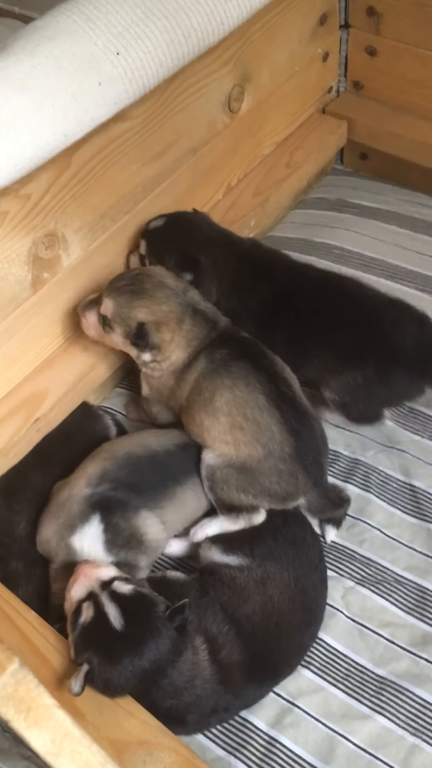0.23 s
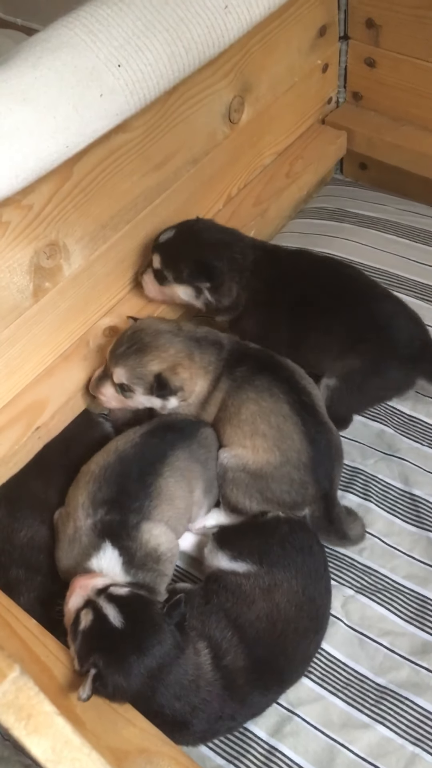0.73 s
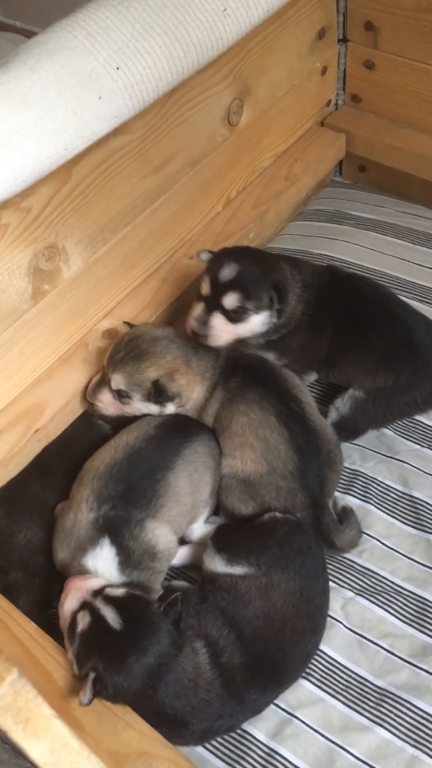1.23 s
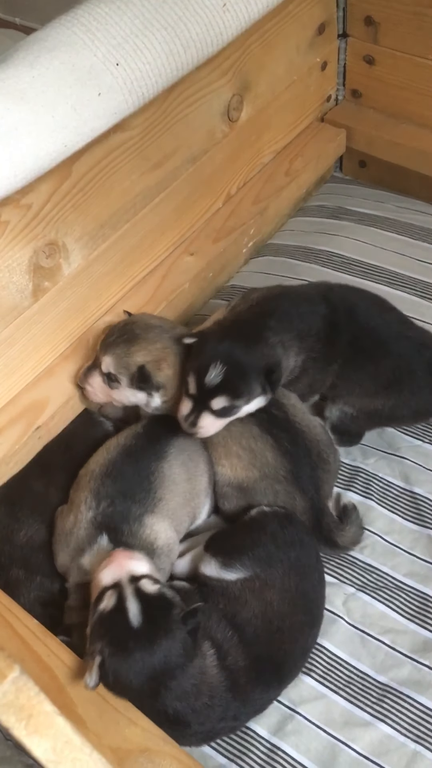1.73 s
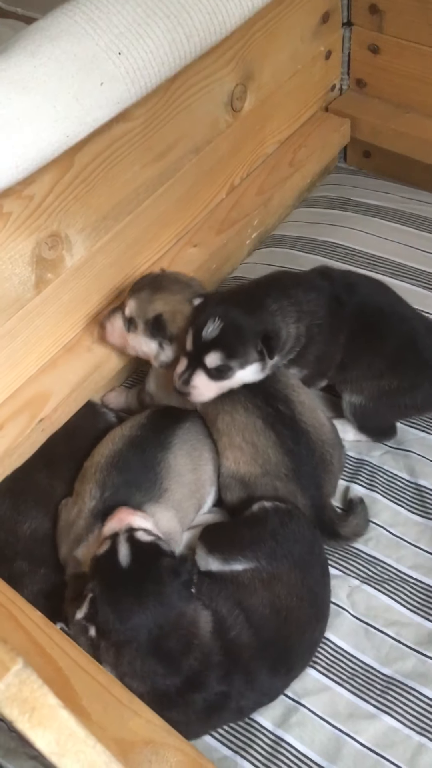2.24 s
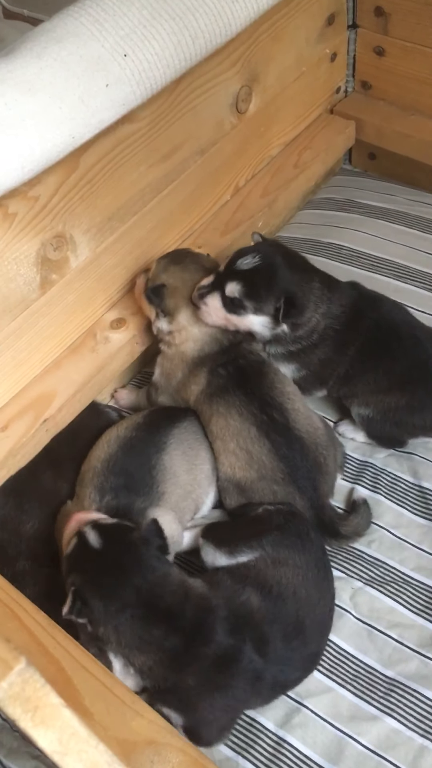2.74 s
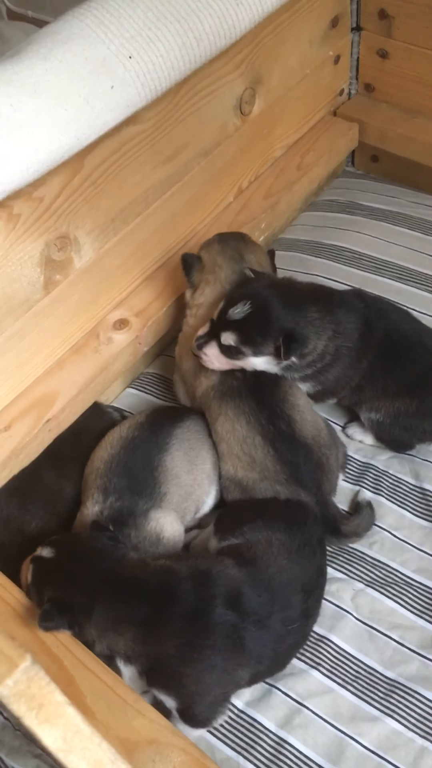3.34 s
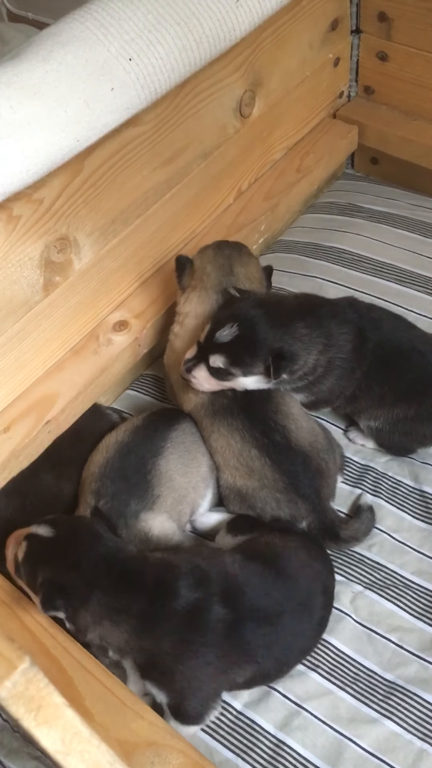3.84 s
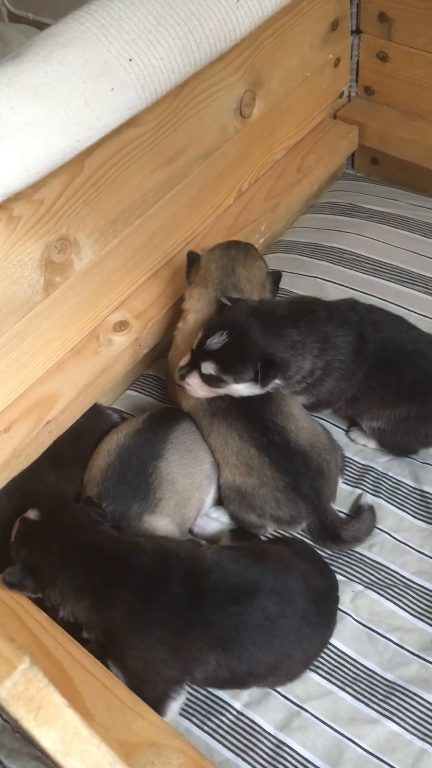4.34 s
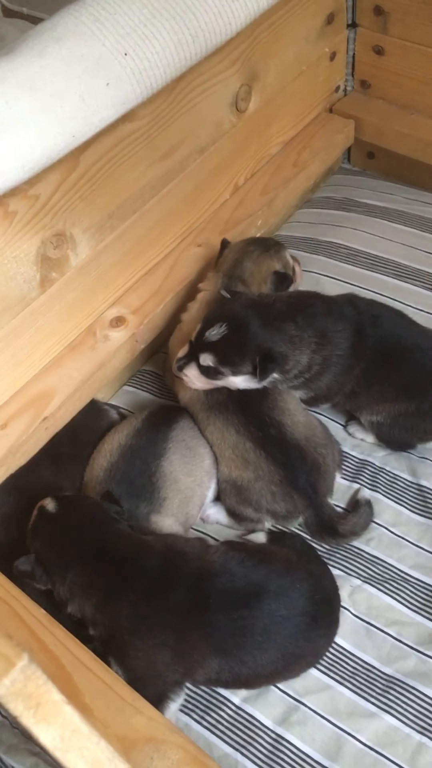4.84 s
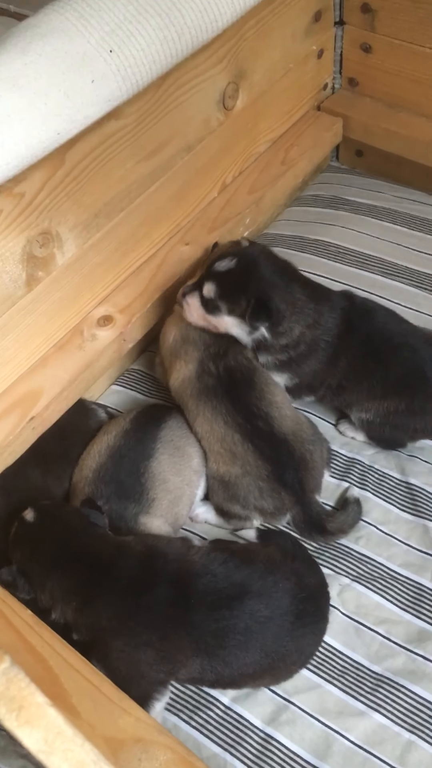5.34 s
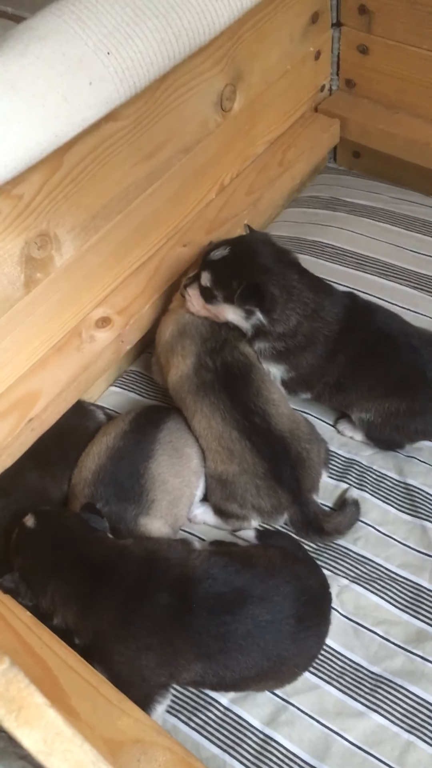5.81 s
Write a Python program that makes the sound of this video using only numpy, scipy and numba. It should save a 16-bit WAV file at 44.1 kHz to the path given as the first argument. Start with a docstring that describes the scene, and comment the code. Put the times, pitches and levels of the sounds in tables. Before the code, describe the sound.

Close, plain phone pickup of very young puppies in a small wooden pen indoors. Short squeaky cries come first, loud and bright, gliding up and breaking downward. A busy patch of claw taps and a dull bump follows, then quieter, lower, broken whimpers with long gaps. Light sniffs, cloth rustle and faint room hum continue underneath, and a sharp wooden tap comes near the end.

```python
"""Newborn puppies squeal and whimper in a wooden box lined with cloth, in a quiet room.
Each voice is a gliding fundamental with overtones shaped by the throat or snout and jumps of register.
Filtered noise makes the nasal hiss, gliding sines its thin whistles, uneven cycles a low grunt.
Claws and bumps ring decaying modes; box echoes and a room tail answer over hum, room tone and shuffling."""
import sys
import numpy as np
from scipy import signal
from scipy.fft import rfft, irfft, next_fast_len
from scipy.io import wavfile
from scipy.ndimage import uniform_filter1d, minimum_filter1d
from numba import njit

SR = 44100
rng = np.random.default_rng(int(sys.argv[2]) if len(sys.argv) > 2 else 0)


def materialize(psi):
    """Save the field psi as 16-bit PCM at rate SR to the path in sys.argv[1].

    A 1-D psi becomes a single channel; in a 2-D psi each row is a channel.
    """
    bounded = np.clip(np.atleast_2d(psi).T, -1, 1)
    quanta = np.round(bounded * 32767).astype(np.int16)
    wavfile.write(sys.argv[1], SR, quanta)


N = 267687
TOP_HZ = 15850  # upper band edge of the phone, and the limit of the overtones


def undb(db):
    """Level law: an amplitude gain is ten to the power of dB over 20."""
    return 10 ** (np.asarray(db) / 20)


def unit(x):
    """Power normalisation: scales the signal to rms 1."""
    return x / np.sqrt(np.mean(x ** 2))


def colour(shape, hz):
    """Spectral envelope: gain at hz, interpolated in dB over log frequency, -90 dB outside."""
    f, db = np.transpose(shape)
    level_db = np.interp(np.log(np.maximum(hz, 1)), np.log(f), db, left=-90, right=-90)
    return undb(level_db)


def noise(shape, size):
    """Spectral shaping: white noise weighted in the frequency domain, rms 1."""
    n = next_fast_len(size)
    hz = np.arange(n // 2 + 1) * SR / n
    spectrum = rfft(rng.standard_normal(n)) * colour(shape, hz)
    return unit(irfft(spectrum, n)[:size])


def walk(rate, size):
    """Low-pass random fluctuation: turns about rate times a second, rms 1."""
    k = max(int(SR / rate), 1)
    smooth = uniform_filter1d(rng.standard_normal(size), k)
    return unit(uniform_filter1d(smooth, k))


def read(table, fade_s):
    """Piecewise-linear control: first sample, fade of the ends and the columns at every sample."""
    s, *columns = np.transpose(table)
    i = np.arange(int(s[0] * SR), min(int(s[-1] * SR), N))
    fade = np.clip(np.minimum(i - i[0], i[-1] - i) / (fade_s * SR), 0, 1)
    return max(i[0], 0), fade, [np.interp(i / SR, s, c) for c in columns]


def add(out, start, x):
    """Superposition: sums x into out from a sample on."""
    out[start:start + len(x)] += x[:len(out) - start]


def voice(phrases, law, heads, tract, rough, jitter, airy_db, patchy_db,
          jitter_hz=900., shimmer_hz=300., glide_s=.005, effort_s=.02):
    """Source and filter: small folds give a strong fundamental and tract-shaped, jittered overtones."""
    s, hz, db = np.concatenate(phrases).T
    t, sounding = np.arange(N) / SR, np.zeros(N)
    for phrase in phrases:
        sounding[int(phrase[0][0] * SR):int(phrase[-1][0] * SR) + 1] = 1
    i = np.flatnonzero(sounding)
    # the muscles round off every turn of the pitch
    hz = uniform_filter1d(np.interp(t, s, hz), max(int(glide_s * SR), 1))[i]
    db = np.interp(t[i], s, db)

    starts = np.array([phrase[0][0] for phrase in phrases])
    which = np.maximum(np.searchsorted(starts, t[i] + 1 / SR) - 1, 0)
    octave_db, over_db, treble_db, dulling = np.transpose(heads)[:, which]
    # octave and overtones follow the averaged level and dull as the phrase goes on (brighten if negative)
    effort_db = uniform_filter1d(db, max(int(effort_s * SR), 1))
    effort_db -= dulling * (t[i] - starts[which])
    law_hz, law_octave_db, law_over_db = np.transpose(law)
    octave_db = octave_db + effort_db + np.interp(hz, law_hz, law_octave_db)
    over_db = over_db + effort_db + np.interp(hz, law_hz, law_over_db)

    phase = 2 * np.pi * np.cumsum(hz * (1 + jitter * walk(jitter_hz, len(i)))) / SR
    k = np.arange(3, 24)[:, None]
    gains = colour(tract, k * hz) * (k * hz < TOP_HZ)
    # treble gain grows from 5 kHz and is full from 10 kHz up
    gains *= undb(treble_db * np.clip(np.log2(k * hz / 5000), 0, 1))
    # every overtone flutters in level at random, on its own
    gains *= undb(patchy_db * np.array([walk(55.0, len(i)) for _ in k]))
    over = np.sum(gains * np.sin(k * phase), axis=0) / np.sqrt(np.sum(gains ** 2, axis=0))
    # air leaking past the folds once a cycle takes the colour of the tract
    over += undb(airy_db) * noise(tract, len(i)) * (1 + np.cos(phase)) / 2

    # the shimmer is twice as deep in the octave and three times in the overtones
    shimmer = [1 + rough * n * walk(shimmer_hz, len(i)) for n in (1, 2, 3)]
    out = np.zeros(N)
    out[i] = undb(db) * shimmer[0] * np.sin(phase)
    out[i] += undb(octave_db) * shimmer[1] * np.sin(2 * phase)
    out[i] += undb(over_db) * shimmer[2] * over
    edges = minimum_filter1d(uniform_filter1d(sounding, 60), 60)
    return np.sqrt(2) * out * edges


def whimpers():
    """Closed-mouth radiation: the snout filters the overtones of the folds."""
    # One list a phrase. Each row: time in seconds, pitch in Hz, level of the fundamental in dB.
    phrases = [
        [(0.0, 2018, -24.5), (0.06, 2288, -22), (0.088, 2190, -23.5), (0.12, 2145, -46.5)],
        [(0.942, 1757, -12.5), (0.95, 1886, -23.5), (0.98, 1881, -25.5), (1.014, 1604, -25),
         (1.024, 1181, -38.5), (1.032, 1183, -32.5), (1.05, 857, -51.5)],
        [(1.612, 1949, -50.5), (1.627, 1867, -23.5), (1.647, 1787, -22), (1.763, 1958, -30), (1.809, 1880, -65)],
        [(2.086, 1886, -30), (2.114, 1863, -36.5), (2.196, 1499, -34), (2.228, 1473, -55.5),
         (2.254, 1367, -36.5), (2.262, 1260, -51.5), (2.284, 1020, -75)],
        [(2.515, 1795, -33), (2.537, 1850, -28.5), (2.543, 1675, -43), (2.567, 1533, -28), (2.589, 1480, -36.5),
         (2.597, 1212, -36), (2.623, 1095, -50), (2.643, 893, -38.5), (2.657, 891, -81.5)],
        [(2.843, 778, -41), (2.855, 705, -50.5), (2.893, 814, -39.5), (2.921, 1060, -44), (2.947, 1067, -44.5),
         (2.977, 878, -34.5), (2.999, 942, -44.5)],
        [(3.71, 1600, -64), (3.73, 1744, -54.5), (3.77, 1680, -79.5)],
        [(3.89, 1860, -72), (3.931, 1938, -54), (3.98, 1957, -72.5)],
        [(4.36, 1623, -57.5), (4.38, 1690, -39), (4.44, 1703, -40), (4.468, 1716, -67)],
        [(4.47, 1742, -53), (4.484, 1670, -39.5), (4.538, 1333, -45), (4.546, 1046, -47), (4.596, 960, -40.5),
         (4.628, 753, -50.5), (4.666, 638, -49), (4.69, 718, -65)],
        [(5.075, 823, -75.5), (5.091, 948, -47), (5.099, 740, -46.5), (5.111, 717, -50), (5.143, 947, -39),
         (5.179, 1075, -57), (5.197, 1074, -44.5), (5.229, 856, -45), (5.259, 955, -41), (5.283, 824, -49.5),
         (5.331, 692, -47.5), (5.359, 710, -73)],
    ]
    # Timbre against pitch. Each row: pitch in Hz, octave and overtones in dB against the effort.
    law = [(650, -10, -25.5), (750, -1, -16.5), (905, -14.5, -27), (1040, -15.5, -18), (1113, -6, -3),
           (1340, -26, -14), (1713, -49, -32), (2250, -27, -35)]
    # Turn of the head and closing mouth. Each row, one a phrase: octave in dB, overtones in dB,
    # treble gain in dB from 10 kHz up, dulling in dB per second.
    heads = [(8.5, 5, 8.5, 96.5), (10, -5, -4, 16), (5.5, 0, 10, -49), (2.5, -5, 6, 23),
             (5.5, -0.5, -7, 15), (3.5, 6, 4.5, -9.5), (4, 3, 4, 15.5), (-2, 4.5, 1, 15),
             (15, 12.5, -5, -48), (-5, -6, -15, -19), (-4, 0, -17, -9)]
    # Resonances of the snout. Each row: frequency in Hz, gain in dB.
    snout = [(2200, -16), (3600, -24), (4500, -26), (4900, -6), (5400, 0), (5900, -3), (6500, -13),
             (7600, -5), (9200, -1), (10400, -13), (11900, -5), (13500, -14), (15600, -17)]
    return voice(phrases, law, heads, snout, rough=.05, jitter=.003, airy_db=-9., patchy_db=4.)


def nose_puffs():
    """Turbulent flow: hiss coloured by two resonances of the nostrils, in short puffs."""
    # Air through the nose, one row a puff. Each row: start in seconds, length in seconds,
    # lower resonance in dB, upper resonance in dB, fall over the puff in dB.
    puffs = [(0.0, 0.13, -50.5, -51.5, 4.5), (.243, .03, -80, -55, 0.5), (0.277, .035, -52, -58.5, 17),
             (0.416, 0.13, -44, -61, 38), (0.849, 0.047, -56.5, -60, 6), (0.935, 0.099, -47, -45.5, 17),
             (1.23, 0.096, -53, -57.5, 23), (1.463, 0.039, -44.5, -65.5, 5), (1.541, 0.32, -57, -61, -2.5),
             (2.053, 0.3, -55.5, -54.5, 23.5), (2.46, 0.2, -55, -68, 3), (2.838, 0.21, -67, -77, -8),
             (3.684, 0.056, -60.5, -69, 3.5), (3.879, 0.16, -68, -69.5, -5), (4.293, .42, -73.5, -70, -2),
             (5.084, 0.33, -64, -76.5, 6)]
    # Two resonances of the nostrils. Each row of each: frequency in Hz, relative level in dB per Hz.
    nostrils = [
        [(2500, -36), (4600, -24), (5600, -13), (6800, -17), (8200, -4), (9200, 0), (9900, -5), (10600, -16)],
        [(10400, -22), (11400, -2), (12300, 0), (13500, -5), (14500, -10), (15900, -11)],
    ]
    out, rise_s, fall_share = np.zeros(N), .015, .3
    # uneven flow
    low, high = (noise(shape, N) * undb(3.5 * walk(30., N)) for shape in nostrils)
    for s, length, low_db, high_db, fall_db in puffs:
        start, fade, (drop_db,) = read([(s, 0), (s + length, -fall_db)], rise_s)
        fade = fade * np.clip(np.linspace(1, 0, len(fade)) / fall_share, 0, 1)
        span = slice(start, start + len(fade))
        hiss = undb(low_db) * low[span] + undb(high_db) * high[span]
        add(out, start, fade * undb(drop_db) * hiss)
    return out


def background(flicker_db=3.5):
    """Stationary and modulated noise: room tone, low hum, uneven shuffle on cloth and soft hiss."""
    # Room tone. Each row: frequency in Hz, relative level in dB per Hz.
    room = [(110, -15), (160, 4), (280, 3), (420, -6.5), (700, -12), (1100, -10.5), (2100, -13.5),
            (3200, -16), (4300, -24), (4900, -24), (6300, -18), (8000, -21), (12500, -17.5), (16500, -21.5)]
    # Low hum. Each row: frequency in Hz, relative level in dB per Hz.
    hum = [(36, -38), (44, -8), (49, 1), (54, -2.5), (68, -16.5), (95, -7.5), (130, -20.5)]
    # Bodies on cloth. Each row: frequency in Hz, relative level in dB per Hz.
    cloth = [(40, -35), (110, -2), (300, -7.5), (450, -15), (900, -29)]
    # Soft mid-range hiss. Each row: frequency in Hz, relative level in dB per Hz.
    hiss = [(290, -34), (500, -4.5), (749, -11.5), (841, -22.5), (900, -7), (1120, -3.5), (1440, -12),
            (2060, -7.5), (2750, -15), (4080, -14), (5000, -23), (6500, -52.5), (11000, -120)]
    # Swell of shuffle and hiss. Each row: time in seconds, shuffle level in dB, hiss level in dB.
    swell = [(0.0, -65, -62.5), (0.49, -56.5, -62), (0.7, -66, -69.5), (1.0, -65, -70), (1.518, -58.5, -63),
             (1.99, -58, -62), (2.3, -65, -74.5), (2.7, -56, -61), (3.16, -70.5, -78), (3.55, -77.5, -81.5),
             (3.95, -63, -72), (4.15, -61.5, -66), (4.9, -63.5, -65), (5.05, -76, -79.5), (5.3, -69.5, -71),
             (5.45, -64.5, -64.5), (6.07, -68, -70.5)]
    tone = noise(room, N) * undb(-65.5) + noise(hum, N) * undb(-62)
    s, *dbs = np.transpose(swell)
    cloth_db, hiss_db = (np.interp(np.arange(N) / SR, s, c) for c in dbs)
    shuffle = unit(noise(cloth, N) * undb(flicker_db * walk(28.0, N)))
    return tone + shuffle * undb(cloth_db) + noise(hiss, N) * undb(hiss_db)


def mode(hz, t60_s, t):
    """Damped resonance: a sine falling 60 dB in t60_s."""
    return np.sin(2 * np.pi * hz * t) * 1000 ** (-t / t60_s)


def claws(tick_t60_s=0.017):
    """Impact excitation: a claw gives a short noisy crack and rings the modes of the board."""
    # Claws on the boards. Each row: time in seconds, tick peak in dB, knock gain in dB.
    taps = [(0.034, -34.5, -49.5), (0.1442, -39, -46), (0.525, -42, -45), (0.6019, -42.5, -45.5),
            (0.7395, -49, -51), (1.1766, -48.5, -55), (1.9528, -36, -37.5), (1.9734, -39, -41.5),
            (2.1525, -35.5, -46.5), (2.3003, -41, -42), (2.4239, -41.5, -45.5), (2.5141, -30, -54),
            (2.574, -35.5, -36.5), (2.6722, -42.5, -53), (2.7771, -39.5, -51.5), (2.9646, -50.5, -40.5),
            (3.4153, -56.5, -73), (3.6714, -62, -58), (3.7253, -47.5, -48.5), (3.922, -63, -40.5),
            (4.0455, -41.5, -47), (4.4762, -50, -77), (5.6414, -28, -37.5)]
    # Spectrum of the crack. Each row: frequency in Hz, relative level in dB per Hz.
    tick = [(1000, 6.5), (2200, -0.5), (3300, 2), (4500, -1), (6200, -1), (9000, -12), (14000, -5.5)]
    # Modes of the board. Each row: frequency in Hz, relative gain in dB, 60 dB decay in seconds.
    board = [(322, 8.5, 0.032), (625, 6, 0.029), (901, 5.5, 0.0083)]
    out, t = np.zeros(N), np.arange(SR // 2) / SR
    for s, tick_db, knock_db in taps:
        crack = noise(tick, len(t)) * 1000 ** (-t / tick_t60_s)
        # every tap excites each mode by a chance amount
        ring = sum(undb(db) * rng.uniform(0.08, 1) * mode(hz, t60, t) for hz, db, t60 in board)
        add(out, int(s * SR), undb(tick_db) * crack / np.abs(crack).max() + undb(knock_db) * ring)
    return out


def bumps(rise_s=0.0075):
    """Soft modal excitation: a body pushes the whole box, whose modes swell in gently and decay."""
    # Bodies bumping the box. Each row: time in seconds, gain of the strongest mode in dB,
    # tilt towards the higher modes in dB per octave.
    pushes = [(0.15, -45, 9), (0.33, -46, -14), (0.475, -39.5, 25.5), (1.366, -47, 8.5), (2.029, -45, 32),
              (2.149, -43, 21.5), (2.585, -30.5, -12), (3.272, -51.5, -2), (5.643, -46.5, 4.5)]
    # Whole-box modes. Each row: frequency in Hz, gain before tilt in dB, 60 dB decay in seconds.
    modes = [(82.6, -10, 0.15), (89, 3.5, 0.18), (115, -0.5, 0.066)]
    out, t = np.zeros(N), np.arange(SR // 2) / SR
    for s, db, tilt_db in pushes:
        gains = np.array([undb(d + tilt_db * np.log2(hz / modes[1][0])) for hz, d, _ in modes])
        gains = gains / gains.max()
        ring = sum(g * mode(hz, t60, t) for g, (hz, _, t60) in zip(gains, modes))
        add(out, int(s * SR), undb(db) * (1 - np.exp(-t / rise_s)) * ring)
    return out


def yelps():
    """Open-mouth radiation: the open throat filters the overtones of the folds."""
    # One list a phrase. Each row: time in seconds, pitch in Hz, level of the fundamental in dB.
    phrases = [
        [(0.299, 1100, -34.5), (0.307, 1145, -20.5), (0.331, 1204, -18.5), (0.353, 1332, -15),
         (0.375, 1442, -9), (0.405, 1515, -18), (0.425, 1410, -15.5), (0.445, 1225, -31), (0.481, 1140, -32),
         (0.497, 992.5, -47.5)],
        [(0.882, 1054, -53.5), (0.89, 1027, -27.5), (0.918, 1341, -23), (0.942, 1555, -15.5)],
        [(1.236, 1007, -50.5), (1.243, 933, -34), (1.262, 930.6, -43), (1.285, 895, -65.5)],
        [(1.478, 961, -44.5), (1.504, 1189, -25.5), (1.524, 1364, -19), (1.546, 1632, -6), (1.554, 1722, -15),
         (1.562, 1910, -19), (1.58, 2015, -36), (1.604, 2040, -50.5)],
        [(1.978, 1095, -56), (1.992, 1122, -36), (2.008, 1209, -30), (2.014, 1298, -39.5), (2.024, 1361, -16.5),
         (2.052, 1724, -14), (2.064, 1814, -20), (2.086, 1819, -23)],
        [(2.448, 1090, -42.5), (2.464, 1110, -44), (2.514, 1406, -33)],
    ]
    # Timbre against pitch. Each row: pitch in Hz, octave and overtones in dB against the effort.
    law = [(950, 4.5, -10.5), (1231, -0.5, -7.5), (1320, -11.5, -9.5), (1437.4, -19, -16),
           (1700, -26.5, -20.5), (2210, -20, -20)]
    # Turn of the head and closing mouth. Each row, one a phrase: octave in dB, overtones in dB,
    # treble gain in dB from 10 kHz up, dulling in dB per second.
    heads = [(3, 2, -12, 48), (1.5, 3.5, 0.5, 24), (-7.5, -11, 6.5, 30.5), (-0.5, 3, 10, 26.5),
             (-7.5, -3, 0, -34), (-18, -8, 10, 11)]
    # Resonances of the open throat. Each row: frequency in Hz, gain in dB.
    throat = [(2400, -5.5), (3700, -1), (4600, -9.5), (5500, -5.5), (7000, -11), (8600, -8), (9600, -12.5),
              (10500, -21), (12500, -18.5), (16000, -24.5)]
    return voice(phrases, law, heads, throat, rough=.05, jitter=.0065, airy_db=-14., patchy_db=5.5)


def nose_whistles(waver=0.0097):
    """Aeroacoustic tone: a narrowed nostril whistles, gliding and wavering as it swells and fades."""
    # Each row: start in seconds, length in seconds, first and last frequency in Hz, level in dB.
    glides = [(3.698, .065, 13480, 14300, -55), (3.763, 0.042, 14170, 11900, -50),
              (3.865, 0.0295, 12340, 13600, -64), (3.977, 0.016, 14900, 14650, -55)]
    out = np.zeros(N)
    for s, length, first_hz, last_hz, db in glides:
        start, fade, (hz,) = read([(s, first_hz), (s + length, last_hz)], length / 2)
        phase = 2 * np.pi * np.cumsum(hz * (1 + waver * walk(800., len(hz)))) / SR
        add(out, start, np.sqrt(2) * np.sqrt(fade) * undb(db) * np.sin(phase))
    return out


def grunt(jitter=0.128, rasp_db=3.0):
    """Irregular oscillation: slack folds behind a closed mouth, low uneven cycles in a dull rasp."""
    # Course of the grunt. Each row: time in seconds, pitch in Hz, level in dB.
    course = [(3.805, 325, -57.5), (3.865, 268, -58), (3.925, 351, -56), (3.97, 303, -71.5)]
    # Its partials. Each row: multiple of the pitch, relative level in dB.
    orders = [(1, 3), (2, -4), (3, -26)]
    out = np.zeros(N)
    start, fade, (hz, db) = read(course, fade_s=.005)
    phase = 2 * np.pi * np.cumsum(hz * (1 + jitter * walk(130.0, len(hz)))) / SR
    tone = sum(undb(d) * np.sin(m * phase) for m, d in orders)
    # Each row: frequency in Hz, relative level in dB per Hz.
    rasp_shape = [(150, -16), (300, 12.0), (700, -6.0), (1200, -14.5), (2500, -39.0)]
    rasp = noise(rasp_shape, len(hz)) * undb(4.0 * walk(74.0, len(hz)))
    add(out, start, fade * undb(db) * (np.sqrt(2) * tone + undb(rasp_db) * rasp))
    return out


def box_echoes(litter):
    """Early reflection: the box walls return delayed, weaker copies of the sound."""
    # Each row: delay in seconds, gain in dB.
    walls = [(.0011, -15), (.0023, -17.5), (.0041, -14), (.0068, -19), (0.0116, -10)]
    out = litter.copy()
    for s, db in walls:
        add(out, int(s * SR), undb(db) * litter)
    return out


@njit
def lines(x, lags, gain, damp):
    """Feedback delay network: eight lines feed each other, duller on every round."""
    line, soft, out = np.zeros((8, 4096)), np.zeros(8), np.zeros(len(x))
    for i in range(len(x)):
        total = 0.
        for k in range(8):
            soft[k] += (1 - damp) * (gain[k] * line[k, (i - lags[k]) & 4095] - soft[k])
            total += soft[k]
            out[i] += soft[k] * (1 - 2 * (k % 2))
        for k in range(8):
            line[k, i & 4095] = x[i] + soft[k] - total / 4
    return out


def room_tail(box, t60_s=0.37, damp=0.1, wet_db=-25):
    """Reverberation: each delay loses level in proportion to its length, for one common decay."""
    lags = np.array([613, 787, 967, 1171, 1399, 1627, 1913, 2239])  # samples
    return undb(wet_db) * lines(box, lags, undb(-60 * lags / SR / t60_s), damp)


def scene():
    """Superposition: the litter, its box echoes, the room tail and the background."""
    voices = whimpers() + yelps()
    litter = voices + nose_puffs() + nose_whistles() + claws() + bumps() + grunt()
    box = box_echoes(litter)
    return (box + room_tail(box) + background())[None]


def record(dry):
    """Band limiting: the phone drops the deepest bass and cuts the top."""
    dry = signal.sosfilt(signal.butter(4, 38, "high", fs=SR, output="sos"), dry)
    return signal.sosfilt(signal.ellip(10, .2, 70, TOP_HZ, fs=SR, output="sos"), dry)


dry = scene()
out = record(dry)
materialize(out)
```